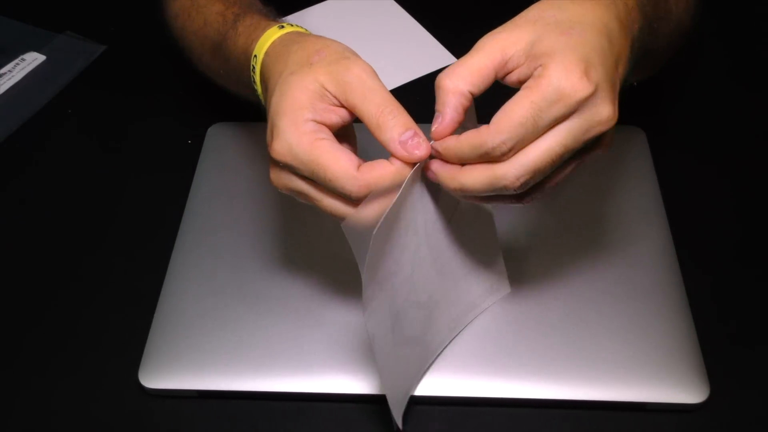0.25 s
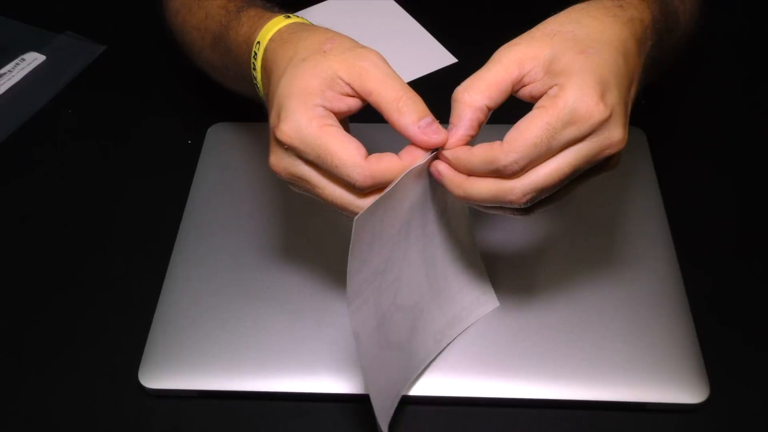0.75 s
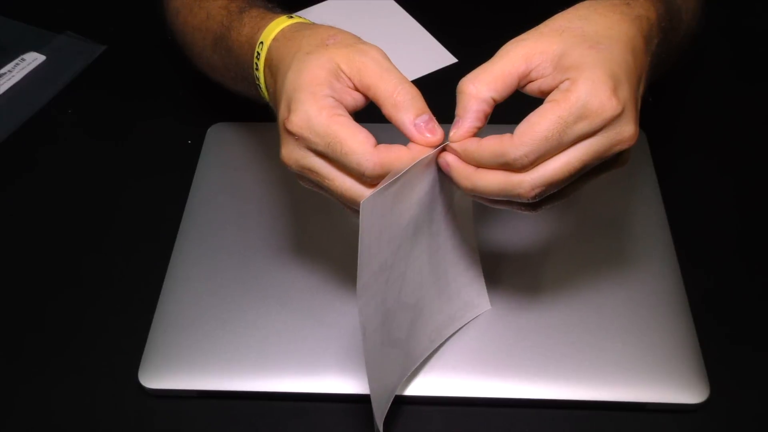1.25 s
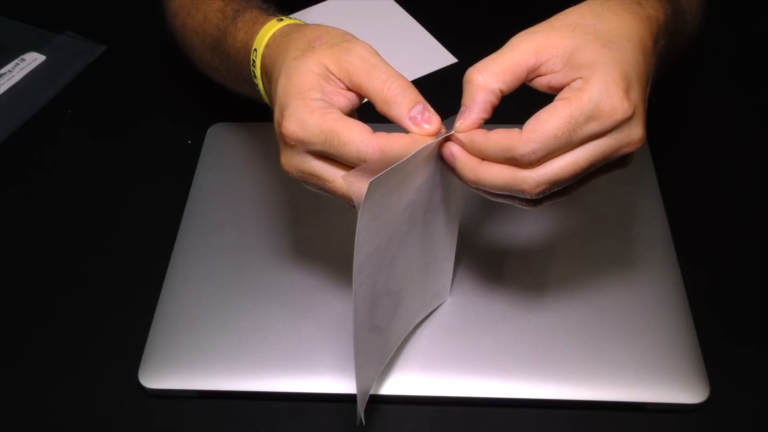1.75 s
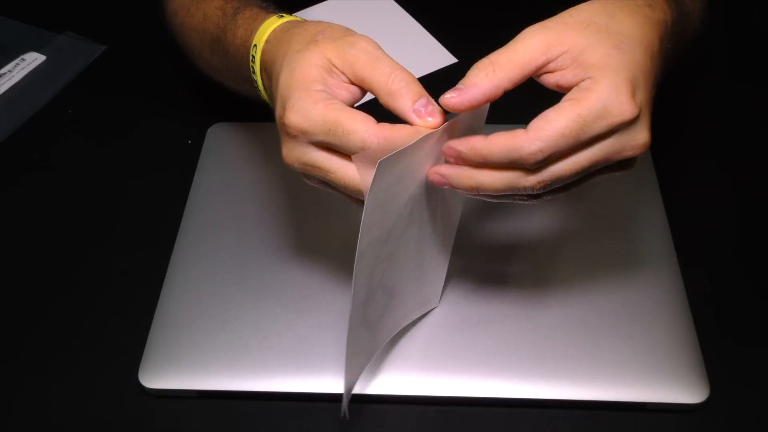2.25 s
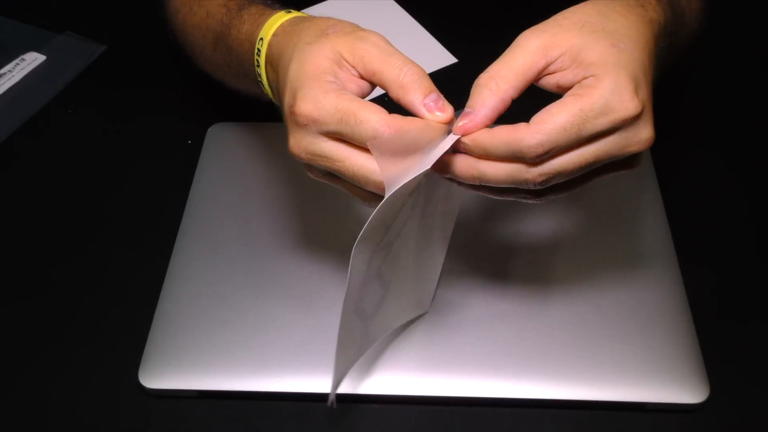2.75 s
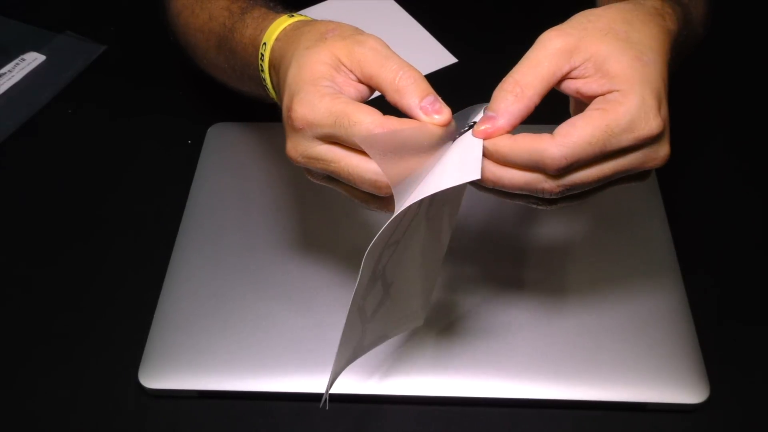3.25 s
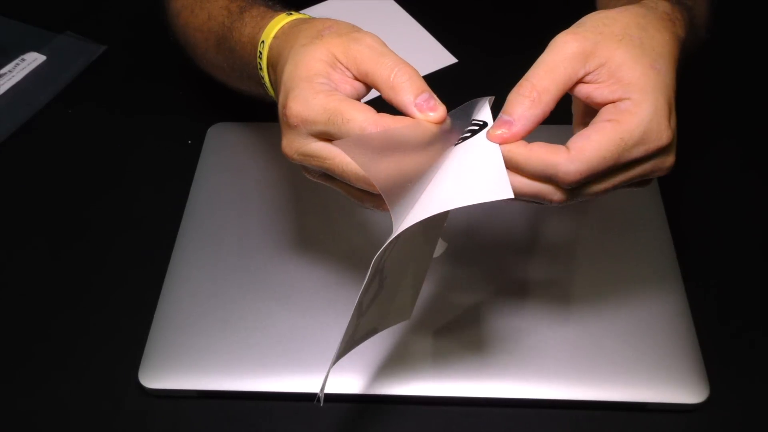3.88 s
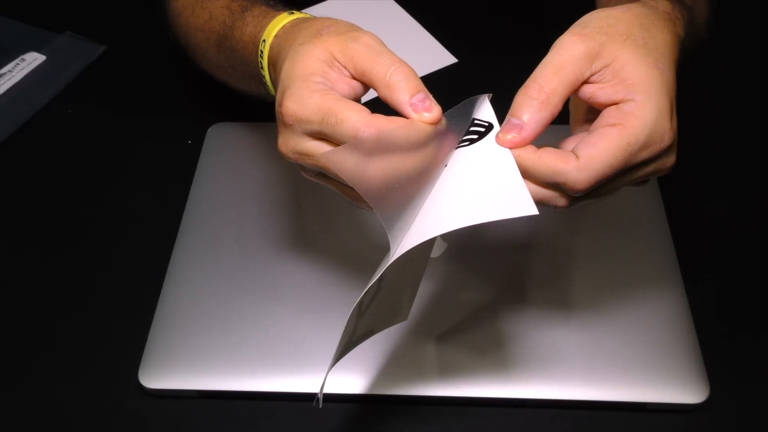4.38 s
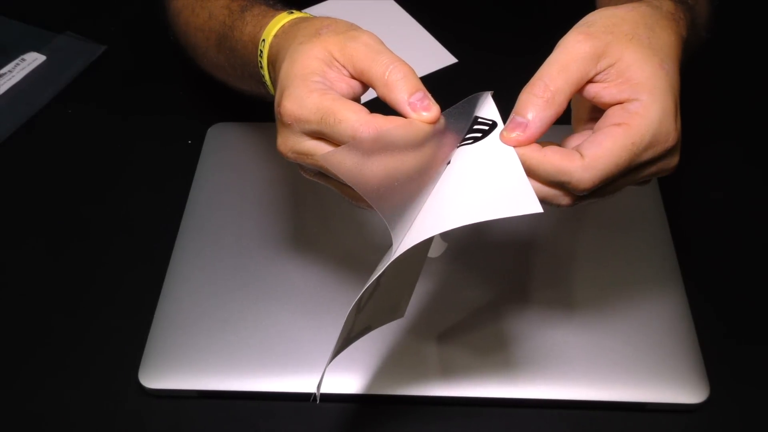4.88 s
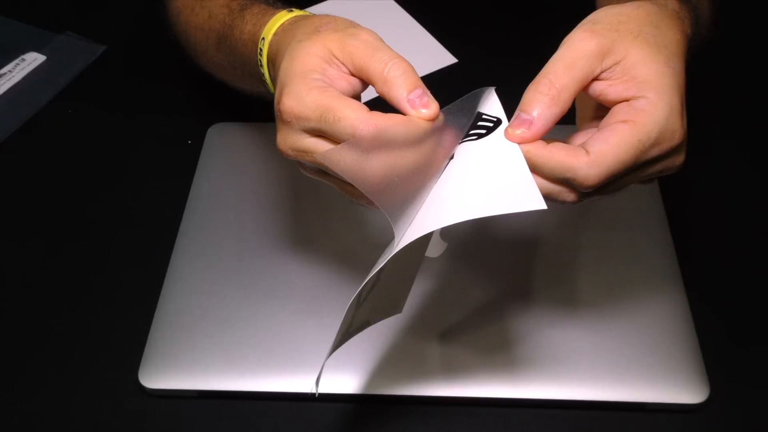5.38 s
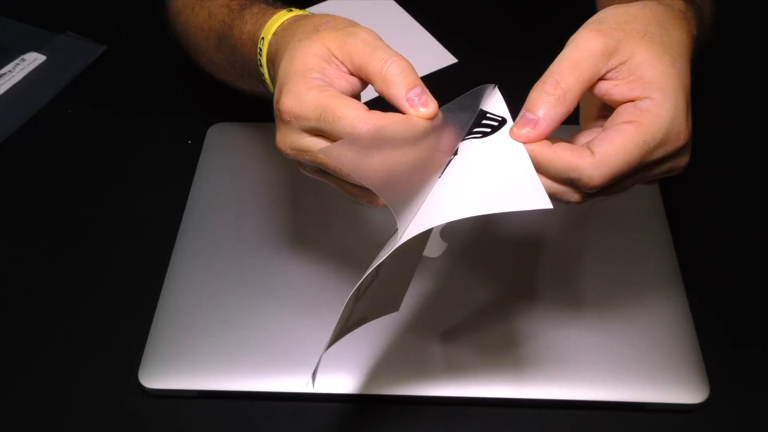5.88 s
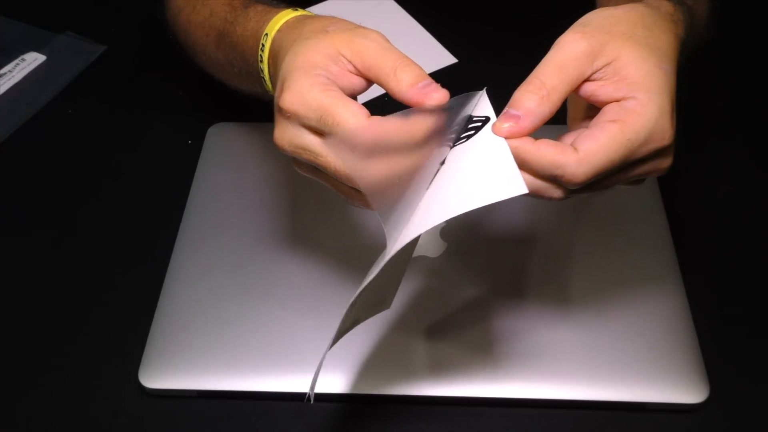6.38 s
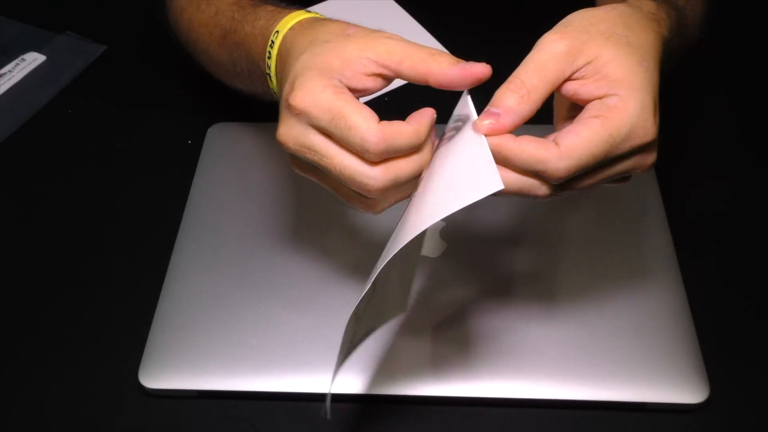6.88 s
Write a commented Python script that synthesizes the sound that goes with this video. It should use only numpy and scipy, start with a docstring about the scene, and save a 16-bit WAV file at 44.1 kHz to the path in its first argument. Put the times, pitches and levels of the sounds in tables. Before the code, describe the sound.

Fingers rub and pick at a vinyl decal, making soft, dull paper rasps, brief swishes and scattered dry ticks. The backing then peels away with a faint fine crackle and a run of tiny clicks that bunch up midway. After a quieter stretch, the stiff paper buckles with a pop and clicks once more. The microphone is close, in a quiet room with a low rumble and faint machine hum.

```python
"""Peeling a vinyl decal

Two hands peel the paper backing off a vinyl decal, close to the microphone in a quiet room. The glue lets go in
tiny dry ticks and a fine crackle, and the stiff paper buckles with a pop. Fingers rub the paper with a dull
rasp and slide over the smooth film with a brighter swish. Under it all lie a low rumble with soft bumps, a
faint machine hum and a faint hiss."""
import sys
import numpy as np
from scipy import signal
from scipy.fft import rfft, irfft, next_fast_len
from scipy.io import wavfile

SR = 44100
rng = np.random.default_rng(int(sys.argv[2]) if len(sys.argv) > 2 else 0)


def store_wav(level_fs):
    """Save 16-bit WAV to argv[1]."""
    pcm = np.round(np.clip(np.atleast_2d(level_fs), -1, 1) * 32767)
    wavfile.write(sys.argv[1], SR, pcm.T.astype(np.int16))


N = 313551
TIME = np.arange(N) / SR

# Levels are relative within each table. A positive tilt brightens the treble, a negative one dulls it.
# nails catch and glue lets go: (time [s], level [dB], tilt [dB/octave], pitch of the freed patch [Hz])
TICK_EVENTS = [(0.3582, -26, 0, 13000), (0.3615, -22.5, -3.5, 4740), (0.5315, -33, 6, 9000),
               (1.073, -20.5, 1, 13000), (1.1524, -26.5, 0.5, 3500), (1.2332, -30, -1, 3700),
               (1.3817, -25.5, -1, 2800), (1.4317, -28, 9, 5300), (1.4339, -14, -5.5, 5200),
               (2.6721, -13.5, 1, 3800), (2.8359, -26, 0.5, 3740), (2.9419, -23.5, 1, 2900),
               (3.0357, -14.5, -2, 7040), (3.1329, -30.5, -3, 11500), (3.1831, -26, -2, 13000),
               (3.232, -31, 2, 4200), (3.3009, -25.5, -2, 8100), (3.409, -22.5, 0.5, 3700),
               (3.5582, -21.5, -2, 13200), (3.7079, -23.5, -1.5, 12100), (3.7915, -30.5, 0, 12100),
               (3.8873, -20, 2.5, 2300), (3.9604, -25.5, 1, 12200), (4.0154, -25, 4, 2300),
               (4.0983, -20, 3.5, 11600), (4.1153, -24, 3, 2600), (4.128, -15, 5, 4560),
               (4.146, -24.5, 2, 4700), (4.15, -13, 4, 3800), (4.1827, -29, 7, 10900),
               (4.2877, -28.5, -1, 9600), (4.5088, -17.5, 2, 10800), (4.5241, -20.5, 5, 2600),
               (5.2767, -33.5, 0, 13100), (5.6379, -29, -0.5, 3500), (5.9361, -25, -1, 3400),
               (6.0238, -29, 3, 7600), (6.1225, -32.5, 2, 8700), (6.5755, -20, -10, 5300),
               (6.5775, -13.5, -3, 6000)]
# ringing notes of the tight film: (pitch [Hz], level [dB], time to fade by 60 dB [s])
FILM_NOTES = [(3570, -42, 0.022), (4350, -39, 0.019)]
# steady peeling between the ticks: (time [s], level [dB])
PEEL_LEVELS = [(2.5, -78.5), (2.75, -71), (3.4, -73.5), (3.9, -72.5), (4.08, -68), (4.2, -71),
               (4.45, -76.5)]
# the sheet buckles: (time [s], level [dB])
BUCKLE_POPS = [(1.4347, -32.5), (6.2143, -23.5), (6.3115, -8.5)]
# the sheet rattles after buckling: (time [s], width [s], level [dB])
RATTLES = [(1.435, 0.0017, -45.5), (6.324, 0.0084, -55), (6.365, 0.0041, -48.5)]
# fingers rub the paper: (start [s], end [s], level [dB])
PAPER_STROKES = [(0, 0.012, -42), (0.137, 0.186, -54.5), (0.273, 0.325, -60), (0.359, 0.411, -56.5),
                 (0.534, 0.572, -61.5), (0.747, 0.782, -66.5), (0.823, .868, -63), (1.159, 1.24, -65.5),
                 (1.274, 1.321, -63.5), (1.361, 1.431, -64), (1.434, 1.511, -59.5), (1.562, 1.646, -63.5),
                 (1.958, 1.984, -63.5)]
# fingers slide over the film: (start [s], end [s], level [dB], tilt [dB/octave])
FILM_STROKES = [(0, 0.007, -41.5, 5), (0.019, 0.092, -44.5, -4), (1.571, 1.645, -66.5, 0),
                (2.01, 2.158, -62, 3), (2.258, 2.285, -67, 4), (6.151, 6.315, -71, -4.5),
                (6.436, 6.478, -65.5, -1), (6.544, 6.582, -62, -4), (6.929, 7.111, -71, -7)]
# the deep rumble and its upper part, the thud: (time [s], rumble level [dB], thud level [dB])
RUMBLE_LEVELS = [(0, -45, -53), (0.2, -46.5, -57), (0.35, -39.5, -54), (0.7, -44.5, -67), (1.1, -49.5, -71),
                 (1.9, -42.5, -60.5), (2.3, -48, -66), (2.8, -43, -63), (3.55, -52.5, -64.5),
                 (4.3, -49.5, -56.5), (4.8, -54.5, -61.5), (5.0, -47.5, -56.5), (5.6, -44.5, -50.5),
                 (6.5, -49, -56.5), (7.11, -40.5, -51.5)]
# soft low bumps as the hands shift: (time [s], level [dB])
HAND_BUMPS = [(0.02, -41), (0.31, -36.5), (0.375, -36.5), (0.5, -42), (0.6, -42), (1.33, -45), (1.62, -48),
              (2.48, -46.5), (2.69, -41.5), (2.93, -46.5), (4.04, -46.5), (4.3, -42), (4.5, -48),
              (4.98, -46), (5.83, -41.5), (6.93, -40)]
# loudness of the machine hum: (time [s], level [dB])
HUM_LEVELS = [(0, -71), (3.65, -69), (3.95, -60), (7.11, -58)]
# tones in the hum: (multiple of the base pitch, level [dB])
HUM_TONES = [(2, -1), (3, -7.5), (4, -12.5), (5, -17.5)]

# the colour of each sound, or how strong it is from bass to treble: (frequency [Hz], level [dB])
TICK_COLOUR = [(200, -26), (900, -18.5), (1900, -11.5), (2500, -7), (3000, -6.5), (4200, -1.5), (7400, 1.5),
               (11000, -3.5), (16000, -9)]
CRACKLE_COLOUR = [(500, -34), (2000, -11.5), (3200, -5.5), (5500, -1.5), (7500, -3), (16000, -10.5)]
BUCKLE_COLOUR = [(200, -33), (560, -6.5), (1000, -6), (1500, -5.5), (2500, 0), (3300, -3), (5000, -16),
                 (7000, -34), (16000, -51)]
RATTLE_COLOUR = [(200, -28), (550, 3), (1200, -3.5), (2800, -8), (4000, -20), (7000, -30), (16000, -45)]
RUB_COLOUR = [(200, -18), (400, -2), (600, 5), (1100, 0.5), (1700, -4), (2300, -2.5), (3400, -4.5),
              (5000, -9.5), (7500, -10.5), (10000, -18), (16000, -31)]
SLIDE_COLOUR = [(500, -17.5), (1800, -11), (2600, -7), (3900, -4), (5100, -3.5), (6900, 1.5), (8400, -3.5),
                (10200, -1), (11800, -10), (14700, -9), (16000, -21)]
RUMBLE_COLOUR = [(10, -4.5), (20, 3.5), (28, 8), (45, -1), (60, -5), (100, -35), (200, -61.5)]
THUD_COLOUR = [(25, -27), (50, -2.5), (62, 0), (90, -6), (130, -18), (220, -33.5), (500, -59.5)]
ROOM_COLOUR = [(40, -11.5), (110, -9), (190, -10.5), (240, -9.5), (350, -12.5), (470, -21.5), (830, -26),
               (1200, -29.5), (2300, -33.5), (5000, -36.5), (14500, -36.5), (16000, -42.5)]
HISS_COLOUR = [(25, 30.5), (100, 9.5), (500, -4.0), (2000, -2.5), (8000, -0.5), (15000, -1)]


def ticks(level_db=-3, stray_count=9, stray_span_s=(3.05, 4.3), stray_range_hz=(3000, 12000)):
    """Nails catch the edge and glue threads part: clear ticks, plus faint strays as the glue strains."""
    out = np.zeros(N)
    for s, db, tilt, hz in TICK_EVENTS:
        add(out, s, from_db(db + level_db) * tick(tilt, hz))
    for s in rng.uniform(*stray_span_s, stray_count):
        db = rng.normal(-38.5, 2)
        add(out, s, from_db(db) * tick(0, rng.uniform(*stray_range_hz)))
    return out


def tick(tilt, patch_hz):
    """One small patch of the sheet jumps free, with a brightness and pitch of its own."""
    patch = sheet_ring(TICK_COLOUR, tilt, ripple_db=2, peak_hz=patch_hz, peak_db=6)
    return snap(patch, scatter_db=-8, fade_s=0.011)


def twang(start_s=4.15):
    """The stretched film rings briefly as the glue jumps free."""
    t, out = np.arange(4096) / SR, np.zeros(N)
    for hz, db, fade_s in FILM_NOTES:
        add(out, start_s, from_db(db - 60 * t / fade_s) * np.sin(2 * np.pi * hz * t))
    return out


def crackle(threads_per_s=1200, spread_db=4):
    """Countless thin glue threads break along the peel line, each with a tiny click."""
    sizes = from_db(spread_db * np.minimum(rng.exponential(1, N), 4))
    signs = rng.choice([-1, 1], N)
    breaks = rng.random(N) < threads_per_s / SR
    clicks = signal.fftconvolve(sizes * signs * breaks, sheet_ring(CRACKLE_COLOUR))[:N]
    return from_db(curves(PEEL_LEVELS)[0]) * unit_level(clicks)


def buckles(level_db=0.4):
    """A larger area flips over with a duller pop, then rattles briefly against the fingers."""
    pops = np.zeros(N)
    for s, db in BUCKLE_POPS:
        pop = snap(sheet_ring(BUCKLE_COLOUR), scatter_db=-11, fade_s=0.014)
        add(pops, s, from_db(db + level_db) * pop)
    rattle = sum(from_db(db) * swell(s, width) for s, width, db in RATTLES)
    return pops + rattle * noise(RATTLE_COLOUR)


def rubs(normal_db=-59.5, tilt_per_db=0.32):
    """Dull, grainy rubbing on the paper, brighter when the fingers press harder."""
    out = np.zeros(N)
    for start, end, db in PAPER_STROKES:
        tilt = min(tilt_per_db * (db - normal_db), 2)
        paper = sheet_ring(RUB_COLOUR, tilt, ripple_db=2.5)
        out += from_db(db) * friction(paper, start, end, grain_db=3)
    return out


def slides():
    """Fingers slide over the film with a bright, smooth swish."""
    out = np.zeros(N)
    for start, end, db, tilt in FILM_STROKES:
        film = sheet_ring(SLIDE_COLOUR, tilt, ripple_db=2)
        out += from_db(db) * friction(film, start, end, grain_db=1.5)
    return out


def snap(ring, scatter_db, fade_s):
    """One sudden release, followed by bending waves that bounce around the sheet."""
    force = from_db(scatter_db) * dying_noise(fade_s, size=1024)
    force[0] = 1   # the release itself
    return signal.fftconvolve(force, ring)


def friction(ring, start, end, grain_db):
    """Skin makes many tiny slips on the sheet, swelling and fading over one stroke."""
    length = end - start
    edge_s = 0.45 * length   # time spent swelling, and again fading
    t, out = np.arange(16384) / SR, np.zeros(N)
    slips = rng.standard_normal(len(t))
    slips *= from_db(grain_db * rng.standard_normal(len(t)))   # uneven sizes sound grainy
    pressure = np.clip(np.minimum(t, length + edge_s - t) / edge_s, 0, 1)
    add(out, start - edge_s / 2, signal.fftconvolve(unit_level(slips) * pressure, ring))
    return out


def sheet_ring(colour, tilt=0, ripple_db=0, peak_hz=1000, peak_db=0, peak_octaves=0.26, size=1024):
    """How the bent sheet answers one tap: a colour, with an optional peak and random ripples in it."""
    octave = np.log2(np.maximum(np.fft.rfftfreq(size, 1 / SR), 1))
    hz, db = np.transpose(colour)
    level = np.interp(octave, np.log2(hz), db)
    level += tilt * np.maximum(octave - np.log2(2500), 0)   # tilt only above 2500 Hz
    level += peak_db * np.exp(-.5 * ((octave - np.log2(peak_hz)) / peak_octaves) ** 2)
    ripple_octaves = np.log2(np.geomspace(300, 17000, 60))
    level += ripple_db * np.interp(octave, ripple_octaves, rng.standard_normal(60))
    # turn the colour into a pulse that starts at once and then dies away (minimum phase)
    cepstrum = irfft(np.log(from_db(level)))
    cepstrum[1:size // 2] *= 2
    cepstrum[size // 2 + 1:] = 0
    pulse = irfft(np.exp(rfft(cepstrum)))
    return pulse / np.linalg.norm(pulse)


def reflections(sound, fade_s=0.26, dull_hz=6000, delay_s=0.004):
    """Sound bounces off the desk and walls, leaving a short, dull tail."""
    tail = np.r_[np.zeros(int(delay_s * SR)), dying_noise(fade_s, size=16384)]
    tail = signal.sosfilt(signal.butter(1, dull_hz, fs=SR, output="sos"), tail)
    return signal.fftconvolve(sound, tail)[:N]


def rumble(level_db=-1, lumps_per_s=9, lump_db=3, bump_width_s=0.023, bump_thud_db=-4):
    """The room rumbles unevenly, and shifting hands add brief swells of rumble and thud."""
    lumps = np.interp(TIME * lumps_per_s, np.arange(128), rng.standard_normal(128))
    deep, thud = from_db(curves(RUMBLE_LEVELS) + level_db + lump_db * lumps)
    bumps = sum(from_db(db) * swell(s, bump_width_s) for s, db in HAND_BUMPS)
    deep = np.hypot(deep, bumps)
    thud = np.hypot(thud, from_db(bump_thud_db) * bumps)
    return deep * noise(RUMBLE_COLOUR) + thud * noise(THUD_COLOUR)


def hum(base_hz=81.5, waver=0.075, beat_s=0.71, crest_s=4.75, beat_db=2.5):
    """Two distant motors hum and beat against each other, so the sound slowly swells and sinks, each of its
    tones wavering a little."""
    sway_times = np.linspace(0, N / SR, 40)
    tones = np.zeros(N)
    for multiple, db in HUM_TONES:
        sway = 1 + waver * np.interp(TIME, sway_times, rng.standard_normal(40))
        tones += from_db(db) * sway * np.sin(2 * np.pi * (multiple * base_hz * TIME + rng.random()))
    beat = beat_db * np.cos(2 * np.pi * (TIME - crest_s) / beat_s)
    return from_db(curves(HUM_LEVELS)[0] + beat) * tones


def noise(colour):
    """Steady noise of the given colour."""
    size = next_fast_len(N)
    hz, db = np.transpose(colour)
    level = np.interp(np.log(np.fft.rfftfreq(size, 1 / SR) + 1), np.log(hz), db)
    spectrum = rfft(rng.standard_normal(size)) * from_db(level)
    return unit_level(irfft(spectrum, size)[:N])


def dying_noise(fade_s, size):
    """Scattered echoes that fall by 60 dB in fade_s seconds."""
    tail = rng.standard_normal(size) * from_db(-60 * np.arange(size) / SR / fade_s)
    return tail / np.linalg.norm(tail)


def swell(s, width_s):
    """A smooth rise and fall around time s."""
    return np.exp(-.5 * ((TIME - s) / width_s) ** 2)


def curves(rows):
    """Join a table's points with straight lines over time, one curve for each level column."""
    s, *columns = np.transpose(rows)
    return np.array([np.interp(TIME, s, column) for column in columns])


def add(out, s, sound):
    """Mix a short sound in at time s."""
    at = int(np.clip(round(s * SR), 0, N - 1))
    out[at:at + len(sound)] += sound[:N - at]


def from_db(db):
    """Turn decibels into a number to multiply by."""
    return 10 ** (np.asarray(db) / 20)


def unit_level(sound):
    """Scale a sound to an average (rms) level of 1."""
    return sound / np.sqrt(np.mean(sound ** 2) + 1e-20)


def scene(echo_db=-16, room_db=-61, side_echo_db=-28, side_hiss_db=-71):
    """Everything sits in the middle; only faint echoes and a faint hiss differ between the ears."""
    decal = ticks() + twang() + crackle() + buckles() + rubs() + slides()
    middle = decal + from_db(echo_db) * reflections(decal)
    middle += from_db(room_db) * noise(ROOM_COLOUR) + rumble() + hum()
    side = from_db(side_hiss_db) * noise(HISS_COLOUR) + from_db(side_echo_db) * reflections(decal)
    return np.array([middle + side, middle - side])


def record(dry, cutoff_hz=16100):
    """A steep filter cuts off the highest treble."""
    return signal.sosfilt(signal.ellip(10, .1, 80, cutoff_hz, fs=SR, output="sos"), dry)


dry = scene()
out = record(dry)
store_wav(out)
```